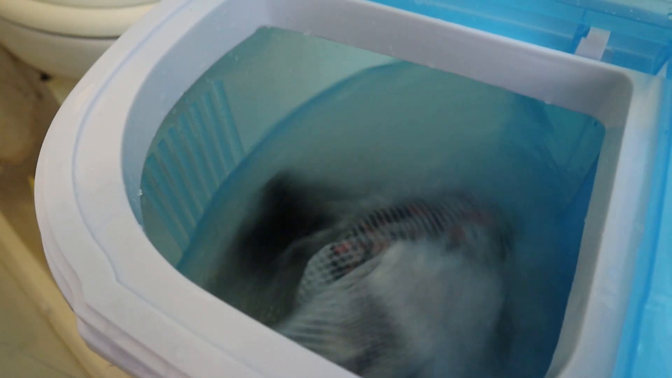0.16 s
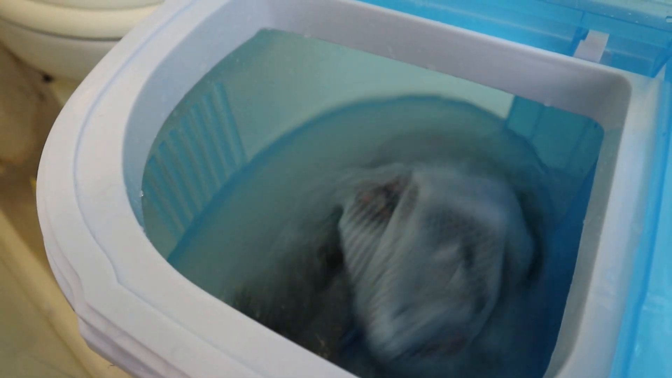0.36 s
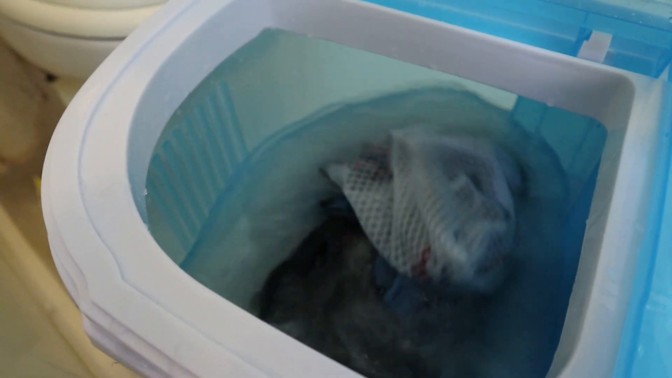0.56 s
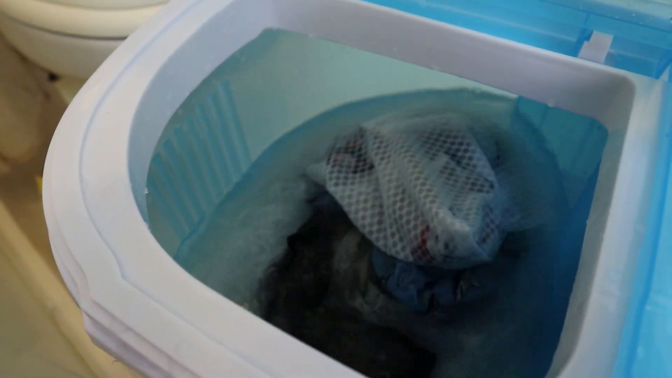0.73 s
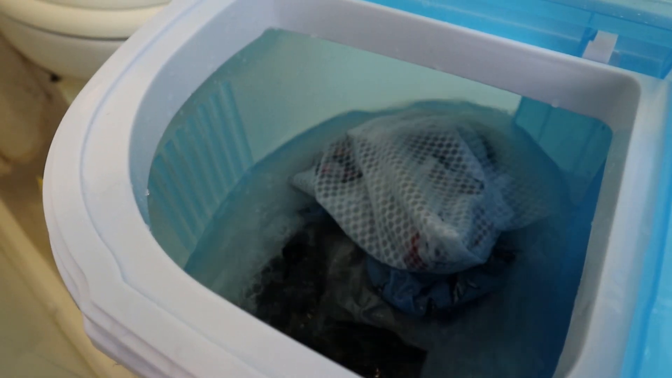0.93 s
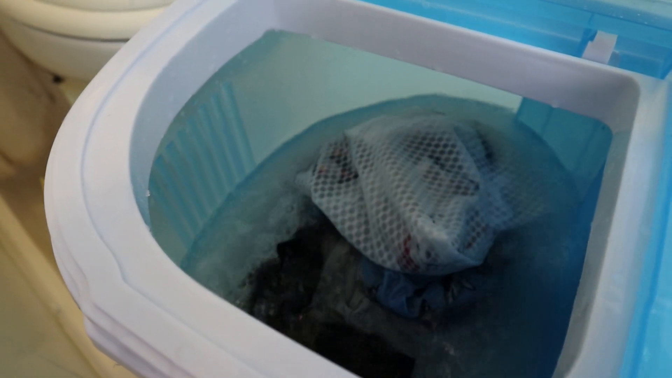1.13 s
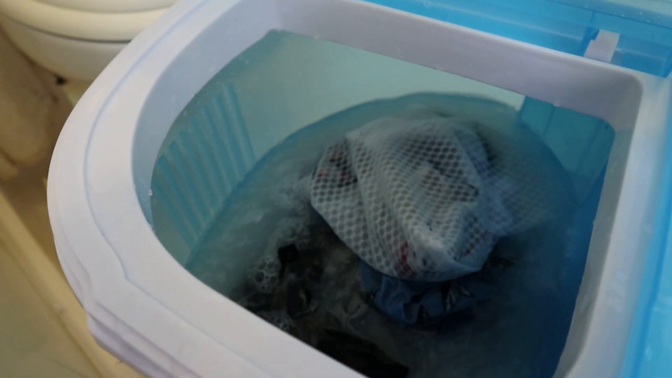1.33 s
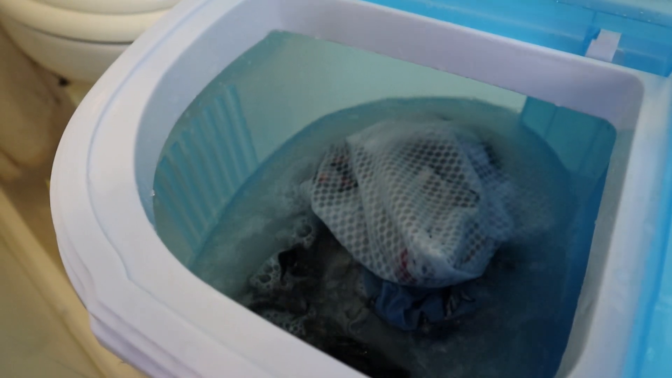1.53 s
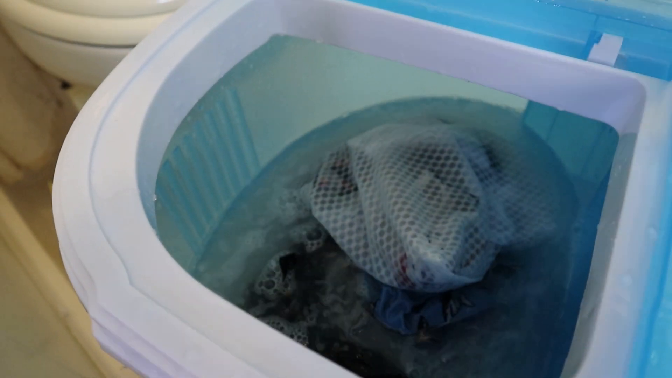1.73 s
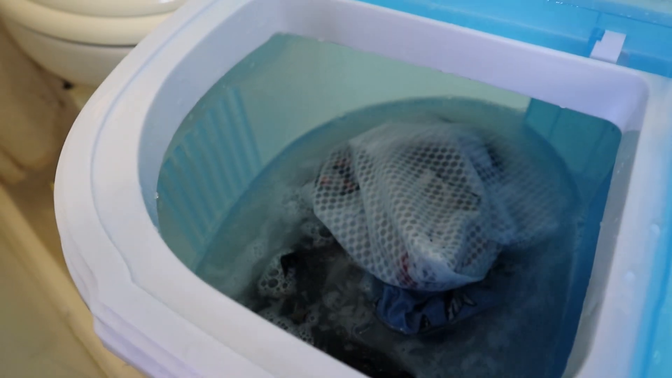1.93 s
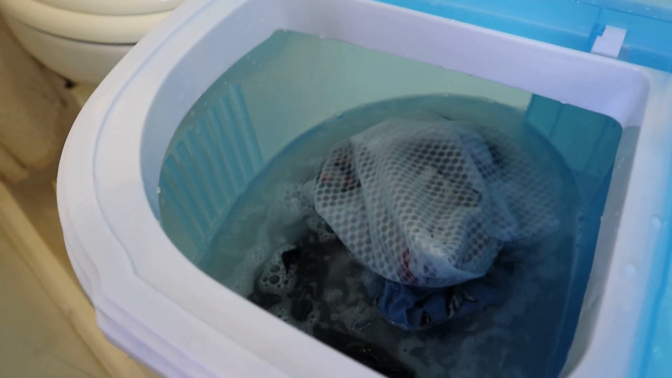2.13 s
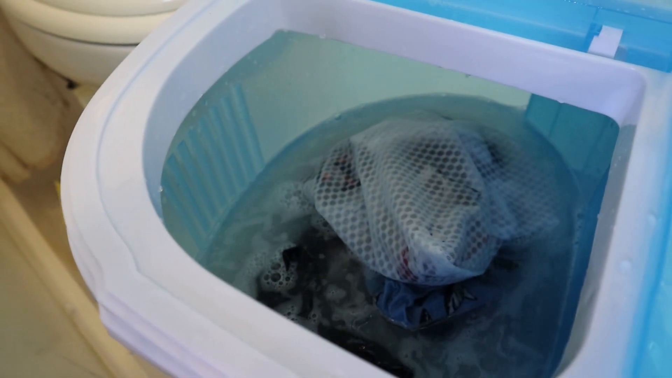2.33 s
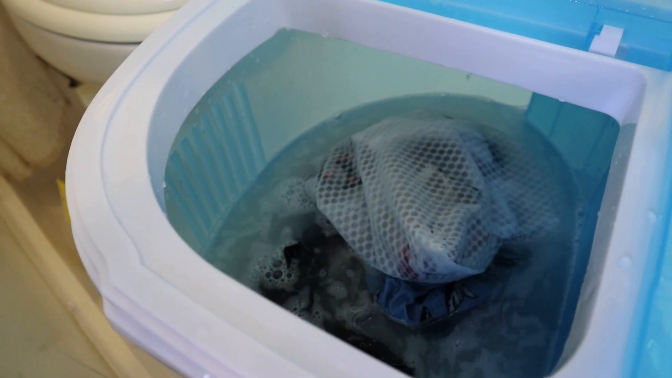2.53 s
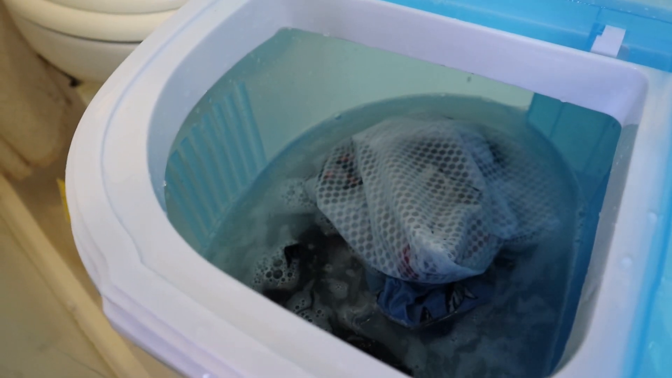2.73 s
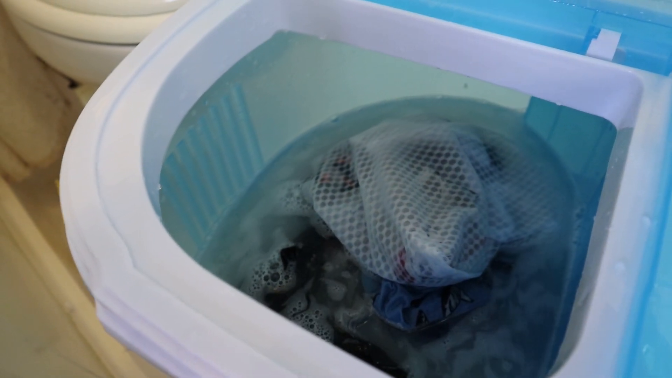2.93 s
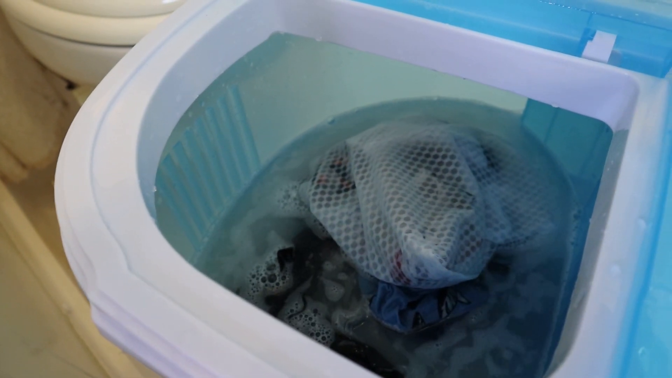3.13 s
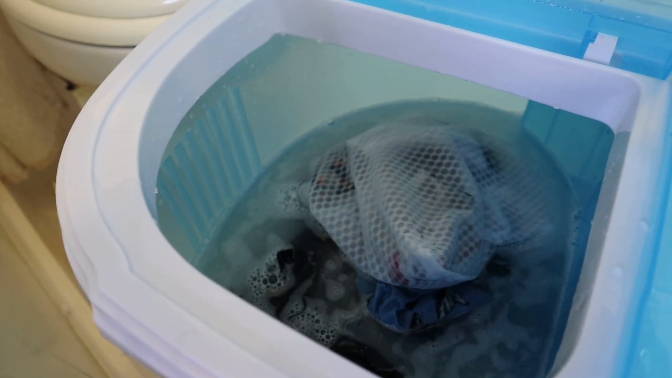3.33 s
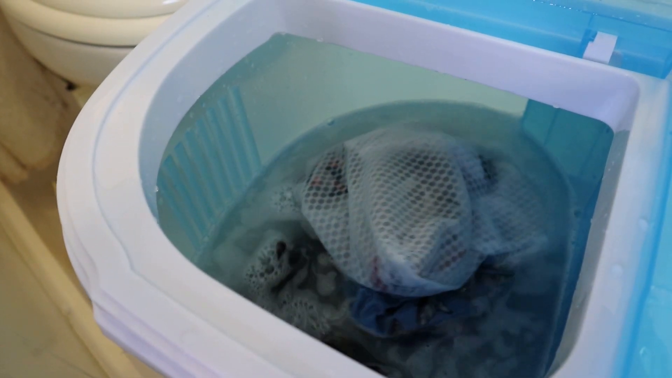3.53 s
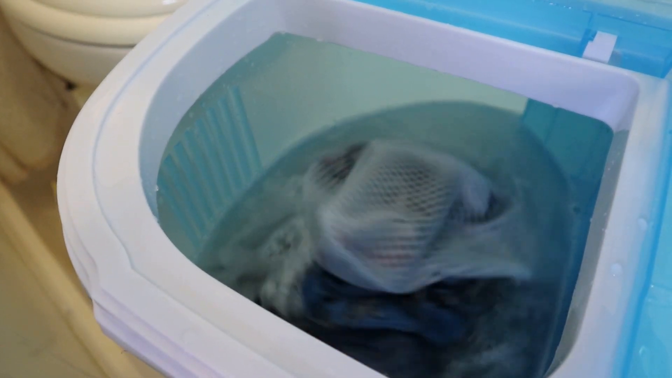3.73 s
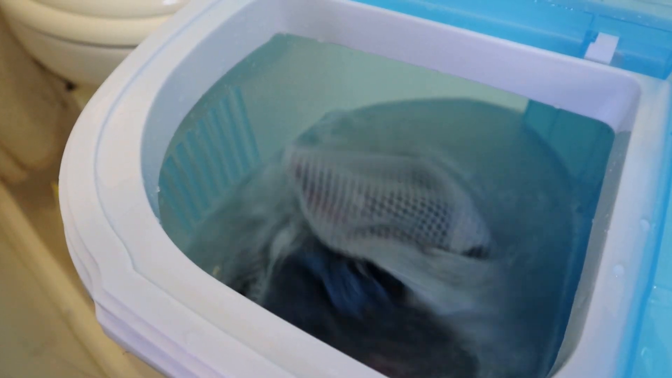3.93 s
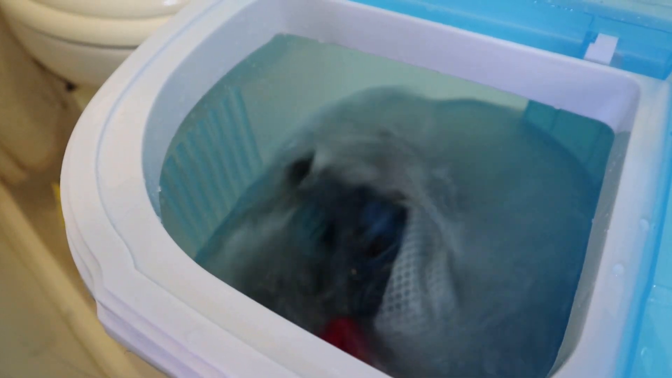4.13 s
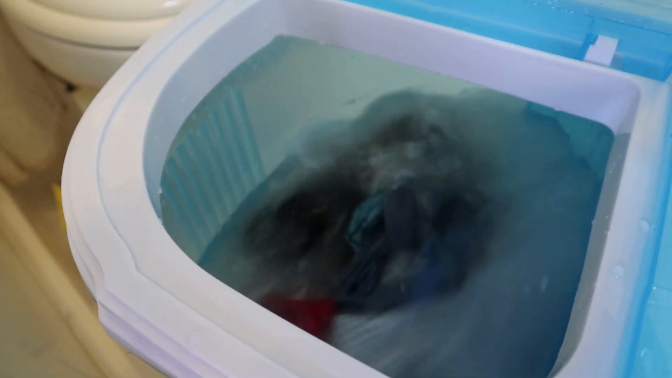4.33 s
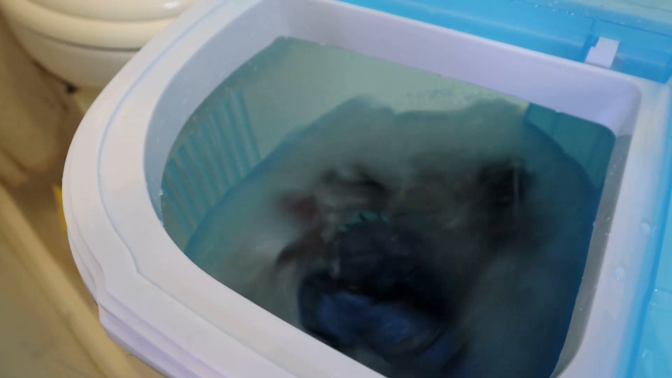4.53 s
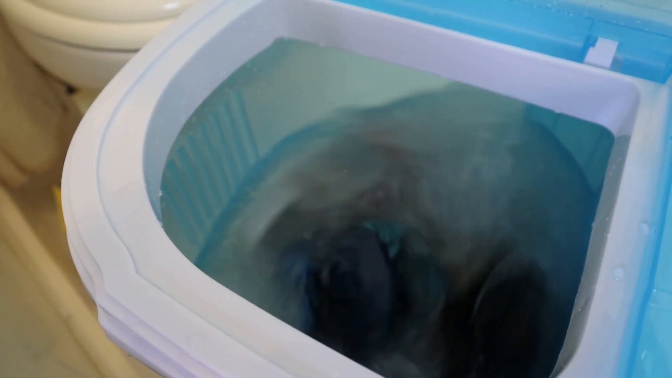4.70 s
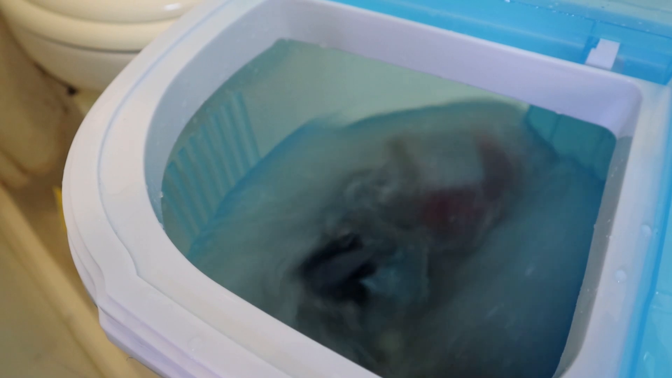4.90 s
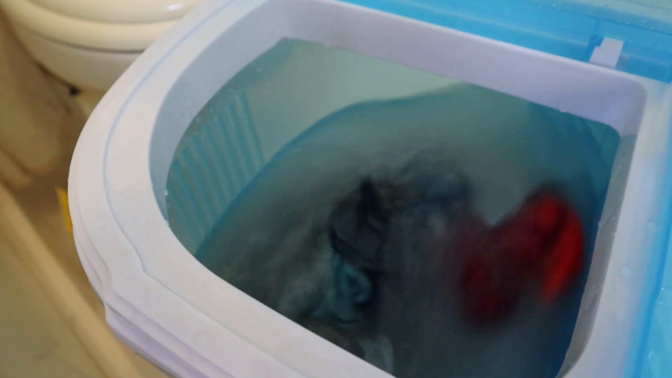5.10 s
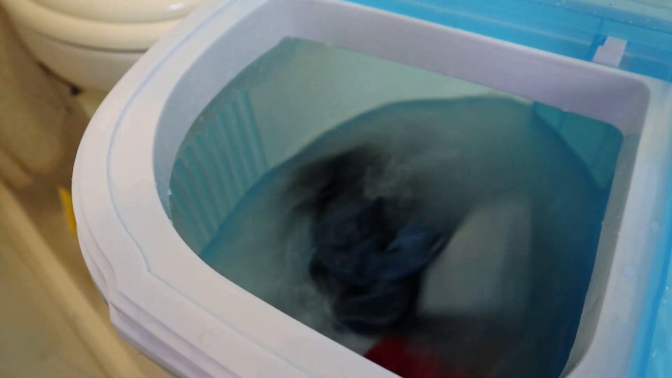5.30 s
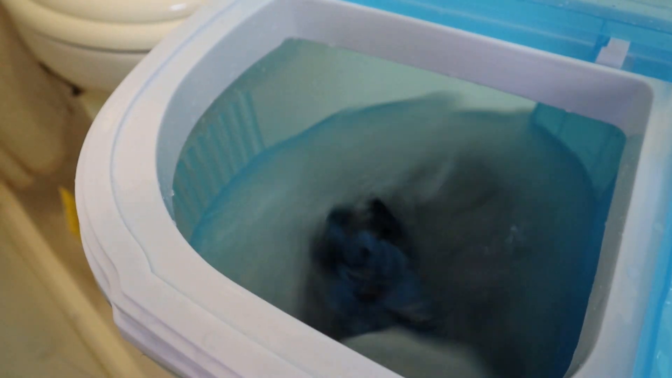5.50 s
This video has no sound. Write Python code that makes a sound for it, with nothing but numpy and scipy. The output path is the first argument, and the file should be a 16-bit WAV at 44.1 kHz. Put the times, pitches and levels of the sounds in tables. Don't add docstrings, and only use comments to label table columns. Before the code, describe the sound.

A small plastic tub washer heard from close above in a tiled bathroom. At 0 s the motor has just stopped: a low thump, then water rocks back and forth with bright splashes, hollow plops, glugs and drips, strongest around 0.25-0.4 s and settling by 0.7 s. Fine fizz fades away. Through the pause a clockwork timer ticks about thirteen to sixteen times a second, dry, rattly and plasticky, over quiet room air; a few soft glugs come near 1.55-1.75 s. At about 3.24 s a contact snaps with a hard, bouncing clack. The motor starts at once, surging by 3.35 s into a steady, low, beating hum with tub rumble and belt whirr; ticking continues, fainter. From about 3.8 s water plops again, and from 4.4 s the turning load splashes, gulps and slaps vigorously, with heavy hits near 4.43, 5.0 and 5.33 s, still churning at the end, around 5.55 s.

```python
import sys
import numpy as np
from scipy import signal
from scipy.io import wavfile
from scipy.ndimage import uniform_filter1d

SR = 44100
rng = np.random.default_rng(int(sys.argv[2]) if len(sys.argv) > 2 else 0)


def amplitude_ratio(level_db):
    exponent = np.asarray(level_db, float) / 20
    return 10 ** exponent


def transcribe(signal):
    frames = np.atleast_2d(signal).T
    limited = np.clip(frames, -1, 1)
    pcm = np.round(limited * 32767).astype(np.int16)
    wavfile.write(sys.argv[1], SR, pcm)


N = 245195


def evened(x):
    return x / np.sqrt(np.mean(x ** 2) + 1e-20)


def curve(rows, outside=-120):
    s, value = np.transpose(rows)
    return np.interp(np.arange(N) / SR, s, value, outside, value[-1])


def add(mix, s, sound):
    part = mix[max(round(s * SR), 0):][:len(sound)]
    part += sound[:len(part)]


def resonate(x, hz, width):
    r = np.exp(-np.pi * width / SR)
    pole = r * np.exp(2j * np.pi * hz / SR)
    return 2 * signal.lfilter([1 - r], [1, -pole], x).real


def coloured(x, points, patchy_db=0, size=1024):
    overlap = size * 3 // 4
    hz, _, z = signal.stft(x, SR, nperseg=size, noverlap=overlap)
    drift = uniform_filter1d(rng.standard_normal(z.shape), 10, 0)
    patches = evened(uniform_filter1d(drift, 8, 1))
    f, db = np.transpose(points)
    shape_db = np.interp(np.log(hz + 1), np.log(f), db, -70, -70)
    z = z * amplitude_ratio(shape_db[:, None] + patchy_db * patches)
    return evened(signal.istft(z, SR, nperseg=size, noverlap=overlap)[1][:N])


def burst(length, rise=0.002):
    t = np.arange(3000) / SR
    return rng.standard_normal(3000) * np.exp(-t / length) * (1 - np.exp(-t / rise))


def grains(per_s, spread_db, length):
    size_db = spread_db * np.minimum(rng.exponential(1, N), 4)
    size = amplitude_ratio(size_db) * (rng.random(N) < per_s / SR)
    swell = signal.lfilter([1], [1, -np.exp(-1 / (length * SR))], size)
    return swell * rng.standard_normal(N)


# (frequency [Hz], density [dB per Hz])
ROOM_SPECTRUM = [(12, -34), (20, 7), (53, 1), (210, -11), (285, -8), (370, -7), (459, -6.5), (642, -11),
                 (780, -10), (949, -16), (1570, -16), (1760, -17.5), (2750, -23.5), (3840, -20),
                 (4300, -29.5), (16000, -37.5)]
# (frequency [Hz], level [dB rms])
BUILDING_HUM = [(31, -60), (50.2, -47), (111, -52.5), (183, -57)]


def room_air():
    t = np.arange(N) / SR
    air = amplitude_ratio(-40.5) * coloured(rng.standard_normal(N), ROOM_SPECTRUM, patchy_db=1.1, size=2048)
    return air + sum(amplitude_ratio(db + 3.5) * np.sin(2 * np.pi * hz * t) for hz, db in BUILDING_HUM)


def tiles(x):
    taps = np.zeros(SR // 3)
    at = np.arange(150, len(taps) - 20, 20)
    taps[at + rng.integers(0, 20, len(at))] = rng.choice([-1., 1.], len(at))
    taps *= amplitude_ratio(-60 * np.arange(len(taps)) / SR / 0.1)
    taps = signal.lfilter(*signal.butter(1, 6000, fs=SR), taps)
    return signal.fftconvolve(x, taps / np.linalg.norm(taps))[:N]


# (frequency [Hz], level [dB])
TUB_WALL = (281.2, -7)


def slosh():
    t = np.arange(N) / SR
    level_db = -42.5 - 3 * t + 3.5 * np.cos(2 * np.pi * 4.13 * t)
    level_db -= 60 * np.maximum(t - 0.59, 0)
    level_db += 12.5 * np.exp(-t / 0.056)
    push = resonate(rng.standard_normal(N), 145, 250)
    sway = resonate(push, 95, 140) + 0.29 * resonate(push, TUB_WALL[0], 58)
    return amplitude_ratio(level_db) * evened(sway)


# (time [s], peak [dB], frequency [Hz])
THUMPS = [
    (.0, -23, 107.5),
    (.215, -26.5, 115),
    (0.289, -37, 180),
    (.395, -30, 268),
    (0.424, -29, 278),
    (0.439, -29.5, 87.6),
    (0.546, -28, 65),
    (.59, -31, 55),
    (3.234, -25, 286),
]


def thumps():
    out, t = np.zeros(N), np.arange(3000) / SR
    for s, db, hz in THUMPS:
        add(out, s, amplitude_ratio(db) * np.sin(2 * np.pi * hz * t) * np.exp(-(t / 0.017 - 1) ** 2))
    return out


def bubbles(level_db, count=1500):
    out, t = np.zeros(N), np.arange(700) / SR
    for s, pitch, size, glide in rng.random((count, 4)):
        hz, s = 900 * 4.8 ** pitch, s * N / SR
        ring = np.sin(2 * np.pi * hz * t * (1 + 14 * glide * t))
        ring *= np.exp(-t * hz / 7) * (1 - np.exp(-t / 0.0012))
        add(out, s, amplitude_ratio(level_db[int(s * SR)] + 9.5 * size - 8.5) * ring)
    return out


# (time [s], level [dB])
CHURN = [(0, -40), (.18, -42), (.3, -39), (.45, -43.5), (.7, -49), (.9, -52.5), (1.5, -57), (1.9, -58),
         (3.6, -81), (3.8, -55), (4.05, -45.5), (4.25, -49), (4.6, -39.5), (4.8, -47), (4.95, -44.5),
         (5.2, -47), (5.42, -44), (5.56, -38)]
# (frequency [Hz], density [dB per Hz])
FIZZ = [(1180, -39), (2000, 8.5), (2780, -47), (3490, 0), (5730, -5.5), (6420, -3.5), (9410, -9.5),
        (12700, -10.5), (16000, -25)]
# (frequency [Hz], density [dB per Hz])
GURGLE = [(250, -24), (450, -9), (700, -6.5), (950, -13.5), (1600, -4), (2050, -6), (2700, -10),
          (3500, -1.5), (3900, -6), (4400, -17.5), (6500, -19.5), (9000, -63)]
# (rate [per s], spread of sizes [dB], length [s])
DROPLETS = (1100, 4.5, .0018)


def churning():
    fizz_db = curve(CHURN)
    gurgle_db = fizz_db + 8 + 2 * np.minimum(fizz_db + 47, 0)
    out = amplitude_ratio(fizz_db) * coloured(grains(*DROPLETS), FIZZ, patchy_db=2.0, size=256)
    out += amplitude_ratio(gurgle_db) * coloured(grains(1400, 2.2, 0.0012), GURGLE, patchy_db=5.5, size=256)
    return out + bubbles(gurgle_db)


# (time [s], peak [dB], strongest frequency [Hz])
SETTLING_SPLASHES = [(0.0642, -13.5, 4300), (0.091, -22.5, 4400), (0.105, -22.5, 6500), (0.1565, -31, 6780),
                     (0.204, -27, 5320), (0.2483, -26, 6140), (0.282, -21.5, 6360), (0.2984, -16.5, 4560),
                     (0.348, -20.5, 4860), (0.394, -13.5, 5270), (0.432, -26, 4800), (0.4622, -20.5, 4460),
                     (0.542, -28, 4800), (0.592, -22, 4600), (0.646, -28, 4650), (0.6926, -26, 5600),
                     (0.715, -27.5, 5760),]
# (time [s], peak [dB], strongest frequency [Hz])
LOAD_SPLASHES = [(3.955, -30, 4740), (4.0216, -33, 4660), (4.105, -29, 4610), (4.2046, -35, 5290),
                 (4.316, -24.5, 4760), (4.3992, -26, 5260), (4.434, -10, 6600), (4.505, -28, 4870),
                 (4.5573, -20, 4670), (4.584, -32, 9700), (4.6424, -16, 4640), (4.687, -24, 9700),
                 (4.7046, -20, 4500), (4.8007, -21, 4470), (4.8623, -22.5, 7000), (4.885, -28, 4900),
                 (4.935, -25, 5210), (4.953, -24, 8750), (4.9746, -20, 5060), (5.027, -17, 7060),
                 (5.095, -18, 9000), (5.1048, -14, 6100), (5.194, -19, 4650), (5.2382, -18, 5270),
                 (5.323, -22, 6000), (5.327, -16, 6900), (5.3309, -8, 4900), (5.479, -21.5, 4900),
                 (5.515, -26, 6410)]


def splashes():
    out = np.zeros(N)
    droplets = signal.butter(2, [2500, 11000], "band", fs=SR)
    for s, db, hz in SETTLING_SPLASHES + LOAD_SPLASHES:
        spray = 0.57 * burst(0.0067, rise=0.0052)
        add(spray, .0025, 1.7 * burst(0.0015))
        body = resonate(resonate(spray, hz, 1780), hz, 5100)
        spray = 0.34 * signal.lfilter(*droplets, spray) + 1.81 * body
        add(out, s - .003, amplitude_ratio(db + 2.5) * spray)
    return out


# (time [s], peak [dB],
# frequency [Hz], ring length [s])
GLUGS = [
    (0.266, -12, 811, 0.01),
    (0.305, -9.5, 606, 0.0048),
    (0.39, -14.5, 670, 0.013),
    (1.549, -22, 660, 0.0031),
    (1.564, -20.5, 526, 0.0057),
    (1.75, -26.5, 870, 0.0048),
    (3.267, -23, 650, 0.0045),
    (1.73, -21, 595, 0.0054),
         (3.7, -28, 650, 0.012), (3.385, -22, 640, .012), (4.3, -21, 460, .01), (4.8, -33, 738, 0.0053),
         (4.655, -13.5, 650, .008), (4, -22, 1300, 0.019), (4.773, -29, 635, 0.0068),
         (12, -29, 681, 0.0065), (5.6, -21, 900, 0.0068), (3.1, -23, 720, 0.0073), (5.08, -24, 910, 0.0081),
         (5.153, -31, 1100, 0.02), (5.245, -26, 670, 0.011), (5.29, -23, 710, .008),
         (5.363, -18, 860, 0.0075), (5.418, -22, 660, 0.009), (5.514, -16, 730, 0.0073),
         (5.265, -16, 1250, 0.0036), (5.07, -22, 930, 0.0056), (12, -25, 1600, 0.0088),
         (6.1, -19, 820, .005), (4.835, -33, 1400, .008), (5.19, -16, 2220, 0.0033),
         (5.474, -31, 6100, .004), (4.885, -28, 1650, .008), (11, -21, 1500, .005),
         (0.12, -29, 1550, 0.0062), (0.35, -16.5, 650, .007), (.49, -33, 1700, .006),
         (0.013, -34, 1090, 0.026), (0.079, -19, 490, 0.0042)]
# (time [s], peak [dB], frequency [Hz])
LOAD_PLOPS = [(3.842, -18.5, 1580), (3.904, -22, 1650), (3.966, -21, 1650), (3.993, -24, 1610),
              (3.954, -20, 2080), (3.955, -17, 730), (4.022, -16, 1070), (4.085, -22, 1600),
              (4.105, -20, 1730), (4.389, -19.5, 2050), (4.418, -5, 1546), (4.435, -13, 1940),
              (4.45, -15, 2050), (4.482, -21, 1940), (4.559, -17, 1230), (4.647, -11, 750),
              (4.688, -22, 660), (4.504, -13, 1940), (4.526, -18, 2020), (4.55, -20, 1300),
              (4.624, -11, 1026), (4.697, -20, 1740), (4.785, -16.5, 1350), (4.857, -18, 660),
              (4.973, -15.5, 1780), (4.976, -7, 1570), (5.032, -12.5, 930), (5.168, -16, 1126),
              (5.19, -18, 720), (5.237, -12, 1720), (5.326, -13, 730), (5.365, -13.5, 1703),
              (5.378, -23, 2230), (5.464, -18.5, 1625), (5.30, -25, 1740), (5.40, -26, 760),
              (5.514, -13.5, 1670)]
# (time [s], peak [dB], frequency [Hz])
SETTLING_PLOPS = [(0.0625, -14.5, 1565), (0.1526, -19.5, 1510), (0.214, -17.5, 1260), (0.2474, -3, 1850),
                  (0.2485, -13, 1600), (0.2484, -9, 1380), (0.2626, -22, 1350), (0.2654, -14, 1010),
                  (0.3926, -16, 1110), (0.122, -24, 2780), (0.363, -23, 2190), (0.303, -9, 1406),
                  (0.3326, -17.5, 2925), (0.3467, -22, 2240), (0.461, -13.5, 1620), (0.5514, -19.5, 3390),
                  (0.6892, -14.5, 1800), (0.69, -19, 2670)]
# (time [s], peak [dB], frequency [Hz])
PLINKS = [(3.996, -29, 3240), (4.085, -22, 2925), (4.612, -24, 4370), (4.699, -20.5, 3750),
          (4.716, -21, 4330), (4.132, -23, 3360), (4.4251, -16, 4430), (4.4332, -10, 4000),
          (4.504, -15.5, 3700), (4.566, -17.5, 3400), (4.602, -20, 3530), (4.9255, -23.5, 3710),
          (4.9796, -18, 3410), (5.105, -16.5, 3870), (5.138, -26, 3400), (5.1512, -21, 3740),
          (5.43, -29, 3310), (5.2044, -18.5, 3000), (5.2589, -23, 3670), (5.5396, -17, 3440),
          (.073, -18, 2500), (.088, -21, 3460), (.125, -20, 2210), (.16, -29, 4140), (.21, -21, 3930),
         (.245, -23, 3250), (.262, -23, 3460), (.313, -20, 3180), (.325, -21, 1910), (.347, -20, 2930),
         (.377, -26, 3180), (.428, -25, 2020), (.442, -24, 3190), (.615, -30, 3630), (5.0, -24, 2010),
         (5.015, -24, 1660), (5.048, -23, 1490), (5.193, -19, 3600), (5.32, -21, 3680), (5.405, -26, 2300),
         (5.475, -25, 3890), (4.53, -25, 3230), (4.62, -24, 3520), (4.655, -22, 1980), (4.725, -21, 3320),
         (4.865, -26, 3900), (4.94, -27, 1990)]
SHORT_RING_S = 0.0037


def plops():
    out, t = np.zeros(N), np.arange(3000) / SR
    short = [(*row, SHORT_RING_S) for row in SETTLING_PLOPS + PLINKS if len(row) == 3]
    for s, db, hz, length in GLUGS + short + [(*row[:3], SHORT_RING_S) if len(row) == 3 else row
                                                     for row in LOAD_PLOPS]:
        ring = np.sin(2 * np.pi * hz * t * (1 + 0.66 * t))
        ring *= np.exp(-t / length) * (1 - np.exp(-t * hz / 3))
        slap = resonate(resonate(burst(0.0048, rise=0.0016), hz, 600), hz, 1200)
        add(out, s - .001, amplitude_ratio(db + 3.0) * (0.76 * ring + 0.43 * slap / abs(slap).max()))
    return out


# (time [s], level [dB], start frequency [Hz], end frequency [Hz], length [s])
AIR_POCKET = (5.505, -25, 753, 1902, .045)


def air_pocket():
    out = np.zeros(N)
    s, db, start_hz, end_hz, length = AIR_POCKET
    u = np.linspace(0, 1, round(length * SR))
    phase = 2 * np.pi * np.cumsum(start_hz * (end_hz / start_hz) ** u) / SR
    add(out, s, amplitude_ratio(db) * np.sin(np.pi * u) * np.sin(phase))
    return out


# (time [s], peak [dB], strongest frequency [Hz])
SPITS = [(0.0243, -32, 10800), (0.045, -40, 9850), (0.0625, -25, 8610), (0.1042, -28, 9910),
         (0.1765, -41, 8810), (0.189, -43, 8840), (0.2149, -28, 8690), (0.293, -24, 10100),
         (0.324, -23, 9000), (0.3624, -28, 8560), (0.391, -30, 11000), (0.394, -11, 11700),
         (0.4599, -29, 10600), (0.4688, -24, 12700), (0.5487, -29, 10300), (0.5984, -23, 9900),
         (0.8071, -35, 13300), (1.1473, -27, 12000), (1.702, -35, 10300), (4.2233, -29, 8940),
         (4.2862, -38, 9900), (4.3221, -33, 8540), (4.4243, -20, 13600), (4.433, -27, 9300),
         (4.4892, -42, 11700), (4.5196, -35, 9000), (4.5336, -27, 8850), (4.5535, -35, 9540),
         (4.584, -14.5, 10200), (4.602, -17.5, 8680), (4.6345, -21, 10600), (4.642, -17, 8700),
         (4.6793, -26, 9710), (4.7036, -17, 9200), (4.7765, -34, 8600), (4.8174, -36, 14300),
         (4.8409, -34, 11500), (4.8884, -42, 11100), (4.9137, -41, 10200), (4.9412, -33, 9180),
         (5.009, -23, 8800), (5.0464, -29, 12100), (5.096, -26, 9550), (5.115, -18, 11100),
         (5.1234, -28, 11300), (5.2335, -26, 8920), (5.261, -23, 8740), (5.329, -10, 8600),
         (5.3924, -28, 9400), (5.4086, -29, 10300), (5.4374, -34, 12800), (5.4495, -28, 8760),
         (5.4705, -30, 11400), (5.4944, -38, 9030), (5.5154, -46, 11300), (5.538, -36, 11700)]


def spits():
    out = np.zeros(N)
    for s, db, hz in SPITS:
        tick = burst(0.00044, rise=0.00028) + amplitude_ratio(-5) * burst(0.0016, rise=.001)
        for _ in range(3):
            tick = resonate(tick, hz, 4100)
        add(out, s + .0006, amplitude_ratio(db - 3) * tick / abs(tick).max())
    return out


# (time [s], peak [dB])
SMACKS = [
    (4.4352, -5),
    (4.5045, -19),
    (4.6425, -19),
    (4.8012, -23),
    (5.1055, -17),
    (5.3312, -11),
    (5.0425, -24),
]


def smacks():
    out = np.zeros(N)
    band = signal.butter(2, [1300, 7000], "band", fs=SR)
    for s, db in SMACKS:
        click = signal.lfilter(*band, burst(.0006, rise=.0002))
        add(out, s, amplitude_ratio(db) * click / abs(click).max())
    return out


# (frequency [Hz], decay time t60 [s], level [dB])
CASE = [(469.7, 0.15, -10.5), (1104, 0.21, -20), (1232, 0.018, -8), (1350, 0.014, 1), (1537, 0.015, 7),
        (1605, 0.024, 6), (1856, 0.02, 4), (1770, 0.016, -3), (2020, 0.016, -8.5), (2237, 0.028, -4),
        (2370, 0.056, -20)]
UPPER_MODE = 6
# (frequency [Hz], frequency [Hz])
HOLLOW_HZ = (614, 676.3)
# (time [s], teeth passed [count])
WHEEL = [(.0644, 0), (.6255, 8), (.6886, 9), (.9598, 13), (1.0333, 14), (1.3772, 19), (1.4418, 20),
         (2.2252, 32), (2.3598, 34), (2.7396, 40), (2.8598, 42), (2.9273, 43), (3.0536, 45), (3.532, 53),
         (4.7477, 73), (4.9391, 76), (5.1728, 80), (5.4959, 85)]
# (time after landing [s], level [dB])
BOUNCES = [
    (0, 1),
    (.0027, -4),
    (.0048, -2),
    (.0082, -2),
    (.0115, -7),
    (.015, -15),
]
# (time after release [s], level [dB])
LET_GO = [
    (0, -8),
    (.0035, -10),
    (.0075, -10),
    (.011, -14),
]
LET_GO_AT, RETURN_AT = .455, .62
# (frequency [Hz], width [Hz], level [dB])
RATTLE = [(3487, 420, 7.5), (3807, 420, 6.5), (4650, 470, 0)]
SNAP_S = 3.2415


def timer():
    out, shakes, t = np.zeros(N), np.zeros(N), np.arange(2600) / SR
    hz, t60, mode_db = np.transpose(CASE)[:, :, None]
    rings = amplitude_ratio(mode_db - 60 * t / t60) * np.sin(2 * np.pi * hz * t) * (1 - np.exp(-t / 0.00066))
    swell = np.exp(-((t - .013) / 0.0079) ** 2)
    linger = 0.36 * np.exp(-((t - .035) / 0.0071) ** 2)
    wall = np.sin(2 * np.pi * TUB_WALL[0] * t) * (swell + linger)
    low, high = [np.sin(2 * np.pi * f * (t - .008)) for f in HOLLOW_HZ]
    hollow = np.exp(-((t - .008) / 0.005) ** 2)
    times, teeth = np.transpose(WHEEL)
    beats = np.interp(np.arange(teeth[-1] + 1), teeth, times)
    chance = np.clip(rng.standard_normal((len(beats), 3)), -2, 2)
    for s, gap, (a, b, c) in zip(beats, np.gradient(beats), chance):
        even_db = -25.5 - 4 * (s > SNAP_S)
        even_db -= 20 * (abs(s - SNAP_S) < gap / 2)
        db = even_db + 0.97 * a
        upper_db = 1.5 - 8 * np.clip(s - 1.3, 0, 1.1) + 2.5 * b
        release = (LET_GO_AT + .012 * c) * gap
        beat = np.zeros(5000)
        for lag, lag_db in BOUNCES + [(lag + release, lag_db) for lag, lag_db in LET_GO]:
            share = amplitude_ratio(2 * rng.standard_normal(len(CASE)))
            share[UPPER_MODE] *= amplitude_ratio(upper_db)
            late = 0.00091 * rng.random() * (lag > 0)
            add(beat, lag + late, amplitude_ratio(lag_db) * share @ rings)
        add(out, s - .0005, amplitude_ratio(db + 12.5) * evened(beat) / 20)
        add(out, s, amplitude_ratio(even_db + TUB_WALL[1]) * wall)
        add(shakes, s - .002, amplitude_ratio(db - 1.5) * burst(0.015, rise=0.0048))
        add(shakes, s + LET_GO_AT * gap, amplitude_ratio(db - 6.0) * burst(0.0086, rise=0.0032))
        knock = (low + rng.uniform(0.33, 1.46) * high) * hollow
        add(out, s + (RETURN_AT + 0.011 * c) * gap - .007, amplitude_ratio(db - 7 + 0.5 * b) * knock)
    for hz, width, db in RATTLE:
        out += amplitude_ratio(db) * resonate(resonate(shakes, hz, width), hz, 1.33 * width)
    return out


# (crack peak [dB], spring frequency [Hz], spring level [dB])
SNAP = (-11.5, 1820, -21.5)


def contact():
    db, spring_hz, spring_db = SNAP
    blows, t = np.zeros(N), np.arange(3500) / SR
    for lag, lag_db in [(0, -4.5), (.004, -3.5), (.0085, -5.5), (.012, -13), (.019, -12), (.026, -13)]:
        add(blows, SNAP_S + lag, amplitude_ratio(db + lag_db) * burst(0.0042))
    modes = [(628, 83, 22.5), (2050, 960, 16.5), (3000, 1200, 2.0), (3860, 1200, 9.0),
             (6760, 3500, -12.0)]
    ring = sum(amplitude_ratio(g) * resonate(resonate(blows, hz, w), hz, 2 * w) for hz, w, g in modes)
    sing = np.sin(2 * np.pi * spring_hz * t) * np.exp(-((t - .032) / 0.018) ** 4)
    add(ring, SNAP_S + 0.0071, amplitude_ratio(spring_db) * sing)
    lift = np.sin(2 * np.pi * 1550 * t) * np.exp(-t / 0.0035)
    add(ring, SNAP_S - .006, amplitude_ratio(spring_db + 1) * lift)
    return ring


# (time [s], level [dB])
EFFORT = [
    (3.24, -30),
    (3.27, -29),
    (3.3, -25),
    (3.33, -13),
    (3.5, -17),
    (4.36, -16),
    (4.46, -18.5),
    (4.58, -18.5),
    (4.9, -17.5),
    (5.56, -20),
]
# (time [s], speed [turns per s])
SHAFT = [
    (3.24, 27.151),
    (3.33, 28.101),
    (3.475, 28.024),
    (4.24, 27.863),
    (4.66, 28.29),
    (4.85, 28.02),
    (5.2, 27.982),
    (5.56, 27.828),
]
# (multiple of the shaft speed [ratio], level [dB])
ORDERS = [(1, -34), (4, -1.5), (5, -6.5), (8, -34.5), (9, -17.5), (12, -25), (16, -24)]
# (multiple of the mains [ratio], level [dB])
MAINS_HUM = [(1, -46), (2, -1.5), (4, -18.5), (5, -16), (6, -36)]
# (time [s], level [dB])
WALL_LEAN = [(3.3, -41), (3.34, -19), (3.6, -18.5), (3.85, -20), (4.0, -18.5), (4.36, -22), (4.46, -49),
             (4.56, -23), (4.64, -23), (4.8, -25), (5.0, -20.5), (5.3, -22.5), (5.4, -36), (5.46, -17),
             (5.56, -26.5)]
# (frequency [Hz], density [dB per Hz])
RUMBLE = [(25, -43), (50, -7), (75, -18), (108, -3), (135, -1), (156, -9), (172, -4), (190, -2.5),
          (213, -16), (232, -10.5), (262, 0.5), (300, -18.5), (345, -26.5), (420, -36), (600, -45)]
# (frequency [Hz], density [dB per Hz])
WHIRR = [(190, 12.5), (330, -1), (420, -6.5), (473, -8), (567, -11.5), (710, -8.5), (1280, -16.5),
         (1530, -20.5), (2000, -13), (2230, -21.5), (3940, -20), (6680, -38.5), (12000, -54), (15600, -75),
         (22000, -120)]
# (time [s], width [s], whirr level [dB])
SURGE = (3.39, 0.097, 5.2)


def motor():
    t, effort_db = np.arange(N) / SR, curve(EFFORT)
    running_db = np.minimum(effort_db + 16, 0)
    turns = np.cumsum(curve(SHAFT, 0)) / SR + .665
    mains = 59.96 * t + .31

    def tone(multiple, cycles):
        return np.sqrt(2) * np.cos(2 * np.pi * multiple * cycles)

    lines = sum(amplitude_ratio(db) * tone(k, turns) for k, db in ORDERS)
    lines = lines + sum(amplitude_ratio(db) * tone(k, mains) for k, db in MAINS_HUM)
    rumble = amplitude_ratio(-3) * coloured(rng.standard_normal(N), RUMBLE, patchy_db=1, size=4096)
    drone = amplitude_ratio(effort_db) * (lines + rumble)
    drone += amplitude_ratio(running_db - 24.5) * tone(2, turns)
    drone += amplitude_ratio(curve(WALL_LEAN) - 0.5) * tone(10, turns)
    surge_s, surge_width, surge_db = SURGE
    whirr_db = -26 + .5 * running_db + surge_db * np.exp(-((t - surge_s) / surge_width) ** 2)
    seam = 1 + 0.13 * np.cos(2 * np.pi * turns)
    return drone + amplitude_ratio(whirr_db) * seam * coloured(rng.standard_normal(N), WHIRR, patchy_db=1.5)


def scene():
    water = slosh() + thumps() + churning() + splashes() + plops() + air_pocket()
    sharp = water + spits() + smacks() + timer() + contact()
    return (room_air() + sharp + amplitude_ratio(-12.5) * tiles(sharp) + motor())[None]


def top_cut(x):
    return signal.sosfilt(signal.butter(12, 15880, fs=SR, output="sos"), x)


def record(dry):
    edge = signal.firwin(1201, 15880, window=("kaiser", 9), fs=SR)
    limited = np.tanh(dry / 1.368) * 1.24
    return top_cut(signal.oaconvolve(limited, edge[None], "same"))


dry = scene()
out = record(dry)
transcribe(out)
```